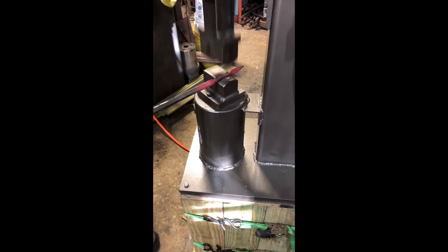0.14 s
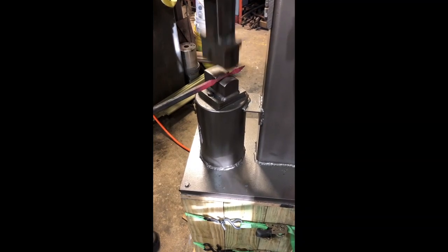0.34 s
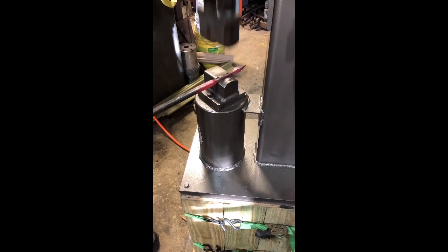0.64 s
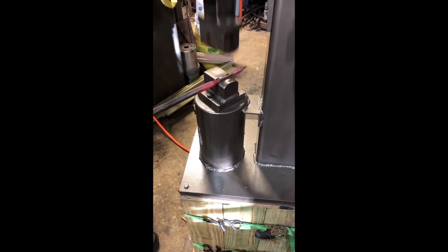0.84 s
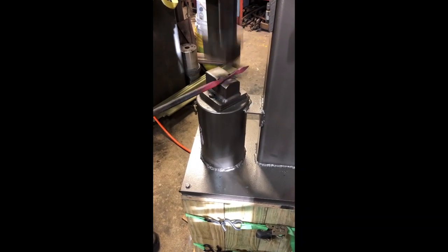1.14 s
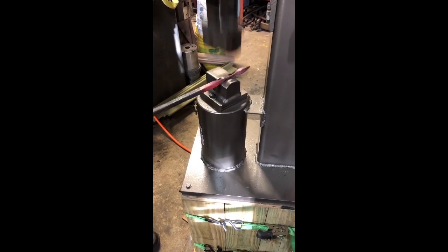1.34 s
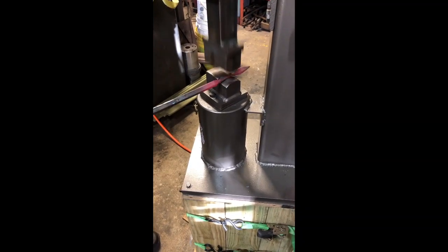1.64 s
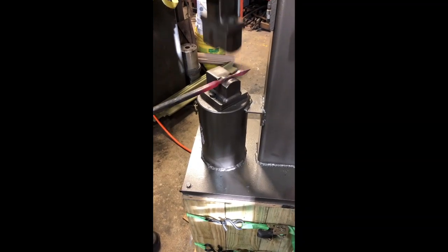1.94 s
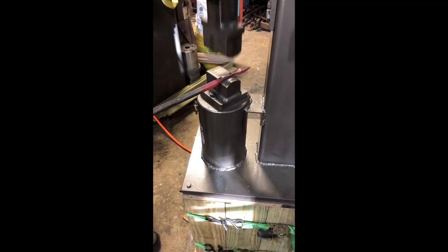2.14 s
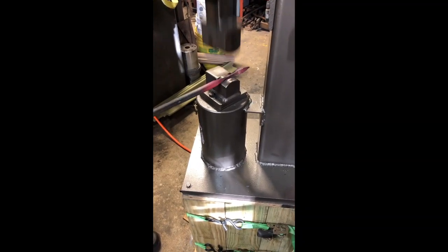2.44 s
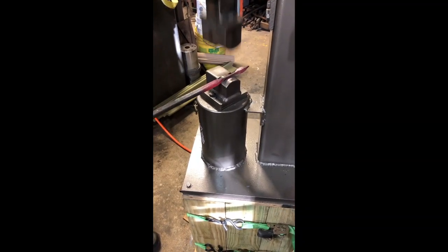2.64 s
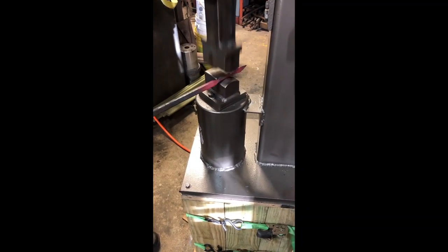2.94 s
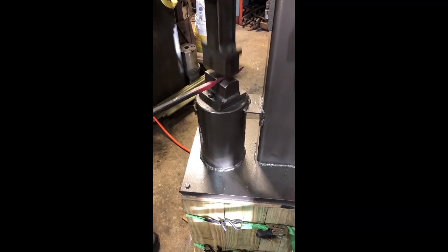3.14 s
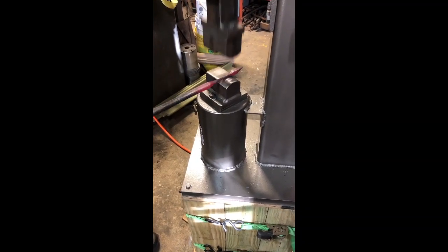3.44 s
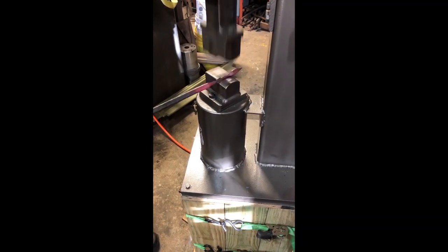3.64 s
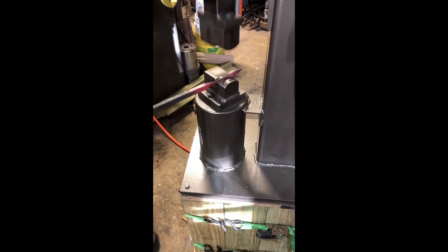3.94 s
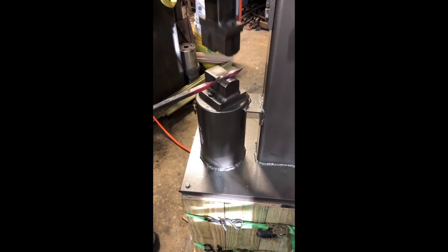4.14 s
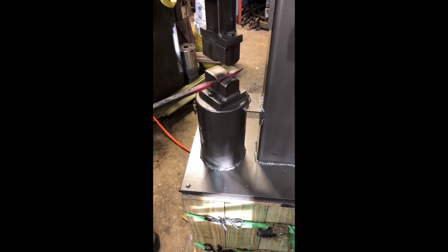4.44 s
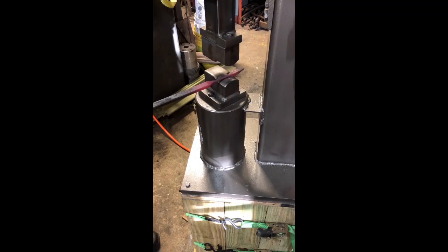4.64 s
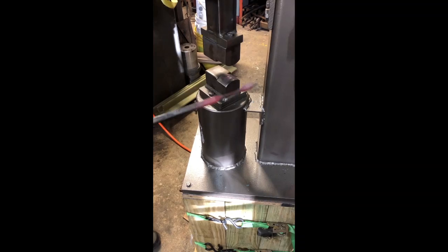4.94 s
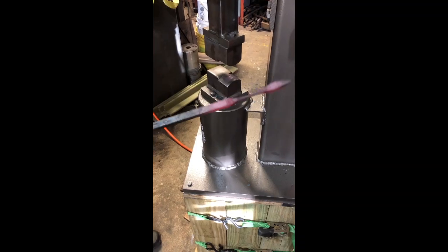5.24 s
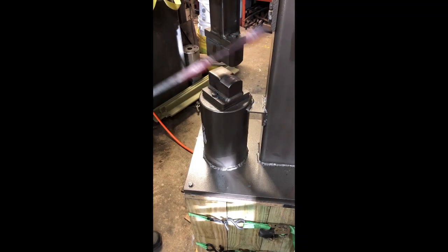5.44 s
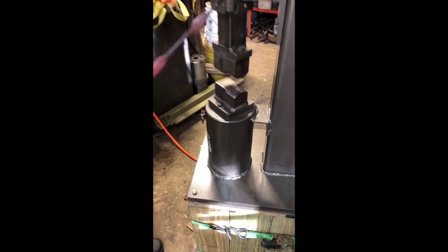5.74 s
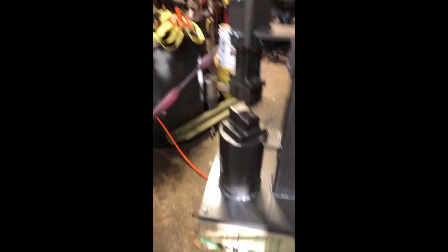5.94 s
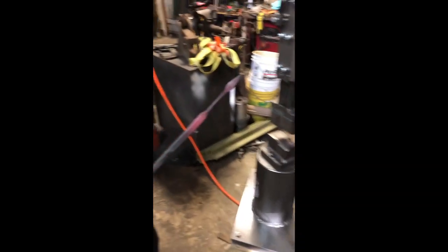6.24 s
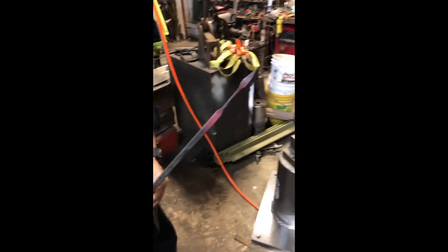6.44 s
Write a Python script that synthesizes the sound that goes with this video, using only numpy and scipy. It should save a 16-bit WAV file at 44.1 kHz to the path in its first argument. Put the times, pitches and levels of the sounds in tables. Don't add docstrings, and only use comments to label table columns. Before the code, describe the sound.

Rapid metallic thuds and spitting compressed air, almost five a second, in a workshop; the hiss cuts off and a low throbbing machine hum remains.

```python
import sys
import numpy as np
from scipy import signal
from scipy.fft import rfft, irfft, dct
from scipy.io import wavfile
from scipy.ndimage import uniform_filter1d

SR = 44100
rng = np.random.default_rng(int(sys.argv[2]) if len(sys.argv) > 2 else 0)


def persist_wave(psi):
    counts = np.round(np.clip(psi, -1, 1) * 32767).astype(np.int16)
    wavfile.write(sys.argv[1], SR, np.atleast_2d(counts).T)


def how_loud(loudness_db):
    steps = np.asarray(loudness_db, float) / 20
    return 10 ** steps


N = 291060

# multiple of stroke rate, level in dB rms.
COMPRESSOR_ORDERS = [(4, -52), (5, -59), (6, -56), (13, -57), (14, -63), (15, -61), (16, -54), (17, -61),
                     (18, -55), (19, -56), (20, -44), (21, -62), (31, -64), (32, -65), (34, -62), (35, -67),
                     (36, -64), (39, -57), (40, -58), (41, -60), (42, -60), (44, -69), (45, -69), (61, -69),
                     (62, -72), (63, -72), (69, -71), (76, -75)]
# frequency in Hz, density in dB per Hz.
CLATTER_SPECTRUM = [(800, -19.5), (1100, 0.5), (2000, -4.5), (3600, -1), (5000, -7), (7000, -28)]
# frequency in Hz, density in dB per Hz.
SHOP_SPECTRUM = [(25, -11.5), (60, -3), (110, -3), (160, -4), (260, -6.5), (340, -4.5), (430, -11),
                 (560, -9), (700, -16.5), (850, -14.5), (1300, -21.5), (1800, -29.5), (3600, -36),
                 (7500, -30.5), (16000, -55.5)]
# centre in Hz, width in Hz, level in dB.
SHOP_RESONANCES = [(1012, 70, -2), (1304, 50, 1), (1980, 60, -8), (2160, 120, -3), (2500, 70, -1.5),
                   (3500, 140, 1), (3820, 90, -0.5), (4420, 160, -4.5), (4840, 150, -5), (6430, 90, -11.5)]
# start in seconds, peak in dB.
SCALE_FLAKES = [
    (6.4718, -73),
    (6.4953, -67),
    (6.4953, -64.5),
    (6.5227, -59),
    (6.5377, -58),
]
# start in seconds, peak in dB.
LEAK_PUFFS = [
    (4.805, -56),
]
# centre in Hz, width in Hz, level in dB.
EMPTYING_WHISTLES = [(2750, 53, 0.5), (2180, 90, -8), (1360, 80, -4)]
# time in seconds, dB re full flow.
EXHAUST_FLOW = [(0, 0), (1.3, 0), (1.8, -1), (2.3, 0), (2.8, 0.5), (3.3, -0.5), (4.1, 0), (4.29, -3),
                (4.38, -6.5), (4.43, -8), (4.48, -20), (4.55, -25.5), (4.7, -53), (4.9, -76.5)]
# frequency in Hz, density in dB per Hz.
JET_SPECTRUM = [(250, -38.5), (650, -15.5), (900, -21), (1400, -11), (2300, -1.5), (3300, -1.5), (4500, -3),
                (5000, -6), (6500, 0), (8500, -0.5), (10000, -1), (12300, 1), (14000, -4), (15700, 1)]
# centre in Hz, width in Hz, level in dB.
PIPE_WHISTLES = [(2092, 62, -8.5), (2377, 110, -6), (2810, 94, -15.5), (5123, 40, -2.5), (5055, 50, -5.5),
                 (5335, 55, -2), (5480, 67, -2), (5625, 47, -2), (6275, 81, -2), (7900, 110, -2),
                 (8460, 150, -1), (10560, 61, -6), (12200, 170, 0)]
JET_EDGES_HZ = [1800, 4500, 9000]
# dB at full flow, dB change per dB of flow.
JET_PARTS = [
    (-33.5, 1.05),
    (-25, 1.17),
    (-19, 1.37),
    (-18, 2.4),
]
# start in seconds, spit peak in dB, flare level in dB.
VALVE_THROWS = [(0.111, -15, -2), (0.3287, -13.5, -3.5), (0.543, -16, -1.5), (0.76, -12, -3.5),
                (0.978, -12.5, -3), (1.1937, -14, -3.5), (1.414, -15, -2), (1.63, -13.5, -2),
                (1.8487, -14.5, -3), (2.074, -13.5, -3), (2.2962, -13, -3.5), (2.5145, -13, -3),
                (2.721, -13, -8.5), (2.936, -10.5, -2), (3.151, -13, -4.5), (3.3753, -13.5, -7.5),
                (3.5936, -15, -4), (3.807, -13.5, -4), (4.034, -12, -2.5), (4.2982, -12, -7)]
# frequency in Hz, density in dB per Hz.
SPIT_SPECTRUM = [(3000, -33), (6000, -2.5), (10000, 3), (13000, 4.5), (16000, 4.5)]
# frequency in Hz, density in dB per Hz.
FLARE_SPECTRUM = [(2500, -23), (5000, -14), (8000, -7.5), (11000, -7), (16000, -16)]
# start in seconds, peak in dB, then die ring, upper body and base thump in dB.
DIE_BLOWS = [(0.001, -23.5, -9, -6.5, -17.5), (0.157, -6, -11.5, -12, -13),
             (0.375, -5.5, -11.5, -12.5, -15), (0.587, -5.5, -8, -11.5, -16.5),
             (0.805, -4, -11.5, -17, -34), (1.024, -5.5, -14, -10, -15), (1.237, -5, -11, -14.5, -16),
             (1.456, -5, -10.5, -12, -13.5), (1.673, -7, -14, -11.5, -10), (1.894, -5.5, -10, -12, -17),
             (2.131, -16, -44, -14.5, -22.5), (2.563, -6.5, -36, -15, -19), (2.771, -7.5, -13, -16.5, -10),
             (2.983, -6.5, -25, -11.5, -15), (3.195, -7, -18.5, -8, -18.5), (3.426, -10, -39, -9.5, -18),
             (3.645, -11.5, -10.5, -9.5, -19), (3.859, -9, -24.5, -21, -24), (4.276, -33, 3.5, -17, -25)]
# frequency in Hz, level in dB, t60 in seconds.
BASE_MODES = [(72, -17, 0.31), (110, -7, 0.15), (177, -3, 0.13), (211, 7.5, 0.063)]
# frequency in Hz, level in dB, t60 in seconds.
FRAME_MODES = [(285.5, -13, 0.15), (328.8, -7, 0.16), (377.8, -3, 0.16), (433.8, 0, 0.14),
               (527.8, -1, 0.037)]
# frequency in Hz, level in dB, t60 in seconds.
UPPER_MODES = [(619, -0.5, 0.093), (685, 8, 0.04), (772.5, 7, 0.07), (982, -17, 0.093),
               (1084.4, -1.5, 0.11), (1370, -34.5, 0.109)]
# frequency in Hz, level in dB, t60 in seconds.
DIE_MODES = [(1491, -3, 0.18), (1540, -2, 0.29), (1768, -10, 0.11), (2104, -7.5, 0.09), (2370, -10, 0.068)]
# frequency in Hz, level in dB, t60 in seconds.
DIE_TICK_MODES = [(3950, 3, .035), (2050, -3, .04)]
# centre in seconds, spared below in Hz,
# two surviving lines in Hz.
DROPOUTS = [(1.699, 500, 770, 1100), (1.741, 40, 1959, 5081), (1.891, 300, 5124, 9410),
            (2.04, 40, 7439, 12177), (2.254, 40, 1959, 3122), (2.659, 40, 6319, 8301),
            (3.001, 500, 1098, 2390), (3.323, 40, 1787, 2379), (3.3443, 40, 3714, 5609),
            (3.577, 40, 2616, 5307), (4.365, 40, 5318, 7773), (4.538, 700, 4952, 6201),
            (4.772, 620, 1324, 6438), (4.836, 380, 2260, 4909), (4.85732, 380, 1884, 6481)]

TIME_S = np.arange(N) / SR


def rms_one(x):
    return x / np.sqrt(np.mean(x ** 2) + 1e-20)


def drift(rate_hz):
    pole = np.exp(-80 * np.pi * rate_hz / SR)
    white = rng.standard_normal(N // 40 + 2002)
    slow = signal.lfilter([1], [1, -2 * pole, pole * pole], white)[2000:]
    return np.interp(np.arange(N) / 40, np.arange(len(slow)), rms_one(slow))


def coloured(spectrum):
    hz, db = np.transpose(spectrum)
    bin_hz = np.maximum(np.arange(N // 2 + 1) * SR / N, 1)
    gain = how_loud(np.interp(np.log(bin_hz), np.log(hz), db))
    return rms_one(irfft(rfft(rng.standard_normal(N)) * gain, N))


def band(x, low_hz, high_hz):
    sos = signal.butter(2, [low_hz, min(high_hz, 0.45 * SR)], "band", fs=SR, output="sos")
    return signal.sosfilt(sos, x)


def band_noise(low_hz, high_hz):
    return rms_one(band(rng.standard_normal(N), low_hz, high_hz))


def clicks(times_s, sizes):
    train = np.full(N, 1e-18)
    train[np.round(np.asarray(times_s) * SR).astype(int)] = sizes
    return train


def ring(x, hz, t60_s):
    radius = how_loud(-60 / (t60_s * SR))
    angle = 2 * np.pi * hz / SR
    return signal.lfilter([0, np.sin(angle)], [1, -2 * radius * np.cos(angle), radius * radius], x)


def resonant(peaks):
    white = rng.standard_normal(N)
    out = 0
    for hz, width_hz, db in peaks:
        t60_s = np.log(1000) / (np.pi * width_hz)
        out += how_loud(db) * rms_one(ring(white, hz, t60_s))
    return out


def swell(times_s, sizes, rise_s, hold_s, fall_s):
    t = np.arange(int(0.25 * SR)) / SR
    shape = np.minimum(t / rise_s, 1) * np.exp(-np.maximum(t - rise_s - hold_s, 0) / fall_s)
    return signal.fftconvolve(clicks(times_s, sizes), shape)[:N]


def compressor():
    stroke_hz, mains_hz, fan_hz = 16.584, 120.0, 69.2
    held_db, back_s = -2, 4.8
    clatter_db, rush_db = -58.5, -50
    turn = 2 * np.pi * stroke_hz * (TIME_S - 0.025) + 0.032 * drift(1.4)
    machine = how_loud(-56) * np.sin(2 * np.pi * mains_hz * TIME_S)
    machine += how_loud(-56) * np.sin(2 * np.pi * fan_hz * TIME_S + 2)
    for order, db in COMPRESSOR_ORDERS:
        phase = (0.75 if order > 30 else 2) * rng.standard_normal()
        machine += how_loud(db + 0.95 * drift(2.4)) * np.cos(order * turn + phase)
    stroke = coloured(CLATTER_SPECTRUM)[:round(SR / stroke_hz)]
    position = (turn / (2 * np.pi) * len(stroke)).astype(int) % len(stroke)
    machine += how_loud(clatter_db) * stroke[position]
    pulse = 1 + 0.06 * np.cos(turn)
    rush = pulse * (coloured(SHOP_SPECTRUM) + how_loud(-14) * resonant(SHOP_RESONANCES))
    gain_db = np.where(TIME_S > back_s, 0, held_db)
    return how_loud(gain_db) * (how_loud(3.5) * machine + how_loud(rush_db) * rush)


def scale_flakes():
    s, db = np.transpose(SCALE_FLAKES)
    return swell(s, how_loud(db - 4), 0.0012, 0.0039, 0.004) * band_noise(9600, 11100)


def leak():
    s, db = np.transpose(LEAK_PUFFS)
    puff = swell(s, how_loud(db), 0.0043, 0.018, 0.005) * band_noise(3000, 15000)
    song = swell([4.43], how_loud(-41), 0.01, 0.018, 0.045) * resonant(EMPTYING_WHISTLES)
    return puff + song


def exhaust():
    jet = coloured(JET_SPECTRUM) + how_loud(-14) * resonant(PIPE_WHISTLES)
    jet = band(band(jet, 620, 21000), 640, 19500)
    octave = np.log2(np.maximum(np.arange(N // 2 + 1) * SR / N, 1))
    above = [1] + [np.clip(0.5 + 2 * (octave - np.log2(hz)), 0, 1) for hz in JET_EDGES_HZ] + [0]
    flow_db = np.interp(TIME_S, *np.transpose(EXHAUST_FLOW))
    shared_db = 0.5 * drift(31.4)
    out = 0
    for low, high, (db, follows) in zip(above, above[1:], JET_PARTS):
        part = rms_one(irfft(rfft(jet) * (low - high), N))
        out += how_loud(db + follows * flow_db + shared_db + 0.64 * drift(28)) * part
    return out


def valve():
    s, spit_db, flare_db = np.transpose(VALVE_THROWS)
    spit = swell(s, how_loud(spit_db + 6.5), 0.0007, 0.01, 0.0068) * coloured(SPIT_SPECTRUM)
    flare = swell(s + 0.012, how_loud(flare_db - 11), 0.0056, 0.033, 0.031) * coloured(FLARE_SPECTRUM)
    dump = swell([4.315], how_loud(-17.5), 0.0029, 0.035, 0.03) * coloured(FLARE_SPECTRUM)
    return spit + flare + dump


def hammer():
    s, db, die_db, upper_db, base_db = np.transpose(DIE_BLOWS)
    thud_hz, thud_t60_s, thud_lag_s = 310, 0.04, 0.0022
    rebound_s, rebound_db = 0.012, -33
    damped_after_s, damping_db_per_s, damped_db = 0.06, 450, -13
    out = -ring(clicks(s + thud_lag_s, how_loud(db + 1.5)), thud_hz, thud_t60_s)
    groups = [(BASE_MODES, base_db + 5), (FRAME_MODES, -1.5), (UPPER_MODES, upper_db + 1),
              (DIE_MODES, die_db + 1), (DIE_TICK_MODES, die_db)]
    for modes, group_db in groups:
        for k, (hz, mode_db, t60_s) in enumerate(modes):
            strength = how_loud(db + group_db + mode_db + 2.4 * rng.standard_normal(len(s)))
            out -= (-1) ** k * ring(clicks(s, strength), hz, t60_s)
    chatter = swell(s + rebound_s, how_loud(db + rebound_db), 0.0046, 0.018, 0.0098) * rng.standard_normal(N)
    for hz, mode_db, t60_s in FRAME_MODES[:3]:
        out += how_loud(mode_db) * ring(chatter, hz, 0.52 * t60_s)
    crack = swell(s, how_loud(db + upper_db - 1.5), 0.00109, 0.00194, 0.03) * band_noise(320, 1300)
    crack += swell(s, how_loud(db + upper_db + 0.5), 0.0005, 0.0017, 0.0019) * band_noise(1800, 4560)
    since_s = TIME_S - s[np.maximum(np.searchsorted(s, TIME_S) - 1, 0)]
    out *= how_loud(np.clip(-damping_db_per_s * (since_s - damped_after_s), damped_db, 0))
    return band(out, 100, 7000) + crack


def room(x):
    t60_s, wall_cut_hz = 0.24, 1450
    dull = np.exp(-2 * np.pi * wall_cut_hz / SR)
    out = np.zeros(N)
    lags = (rng.uniform(0.018, 0.05, 8) * SR).astype(int)
    for k, lag in enumerate(lags):
        loop, state = x.copy(), [0.0]
        gain = how_loud(-60 * lag / SR / t60_s)
        for i in range(lag, N, lag):
            back, state = signal.lfilter([gain * (1 - dull)], [1, -dull], loop[i - lag:i], zi=state)
            loop[i:i + lag] += back[:N - i]
        out += (loop - x) * (-1) ** k
    return out


def scene():
    background = compressor() + scale_flakes() + leak()
    air = exhaust() + valve()
    blows = hammer()
    mono = background + air + blows + how_loud(-16) * room(blows)
    return np.array([mono, mono])


def ducking():
    spit_s = np.transpose(VALVE_THROWS)[0]
    blow_s, blow_db = np.transpose(DIE_BLOWS)[:2]
    spit_dip_db = swell(spit_s + 0.001, 5.24, 0.0048, 0.0052, 0.014)
    blow_dip_db = swell(blow_s + 0.0015, np.maximum(blow_db + 11, 0) * 1.4, 0.0051, 0.005, 0.0027)
    return how_loud(-spit_dip_db - blow_dip_db)


def drop_out(x):
    size = 1880
    window = np.sin(np.pi * (np.arange(size) + 0.5) / size)
    out = x.copy()
    for s, spared_hz, *lines_hz in DROPOUTS:
        at = slice(round(s * SR) - size // 2, round(s * SR) + size // 2)
        a, b, c, d = np.split(x[at] * window, 4)
        lost = dct(np.r_[-c[::-1] - d, a - b[::-1]], type=4, norm="ortho")
        usual = uniform_filter1d(abs(lost), size=81)
        prominence = abs(lost) * (usual > 0.25 * usual[80:].max()) / usual
        given = (np.array(lines_hz) * size / SR).astype(int)
        kept = np.r_[given, 140 + np.argsort(prominence[140:])[-4:]]
        lost[abs(lost) > how_loud(10.5) * usual.max()] = 0
        lost[kept] = lost[kept] - how_loud(14.5) * usual[kept] * np.sign(lost[kept])
        lost[:int(spared_hz * size / SR)] = 0
        late, early = np.split(dct(lost, type=4, norm="ortho"), 2)
        out[at] -= window * np.r_[early, -early[::-1], -late[::-1], -late]
    return out


def low_pass(x):
    return signal.sosfilt(signal.butter(12, 16730, fs=SR, output="sos"), x)


def record(dry):
    ceiling, top_hz = 0.9, 15850
    mono = ceiling * np.tanh(dry[0] * ducking() / ceiling)
    bin_hz = np.arange(N + 1) * SR / N / 2
    cut_db = np.interp(bin_hz, [top_hz - 120, top_hz + 120], [0, -42])
    mono = drop_out(irfft(rfft(mono, 2 * N) * how_loud(cut_db))[:N])
    return low_pass(np.array([mono, mono]))


dry = scene()
out = record(dry)
persist_wave(out)
```